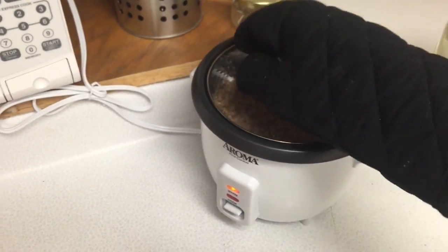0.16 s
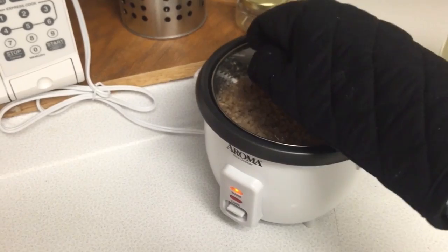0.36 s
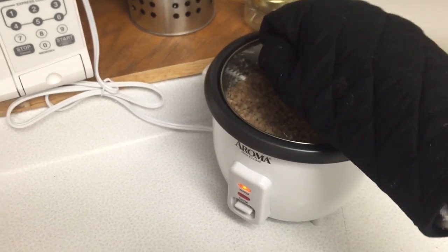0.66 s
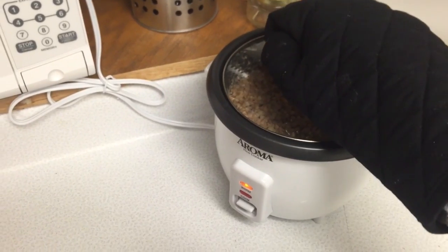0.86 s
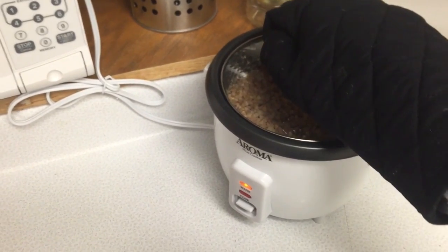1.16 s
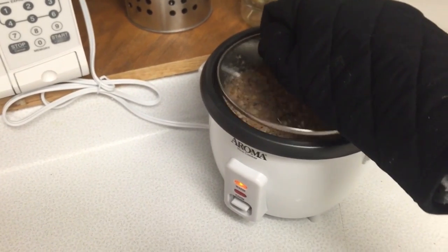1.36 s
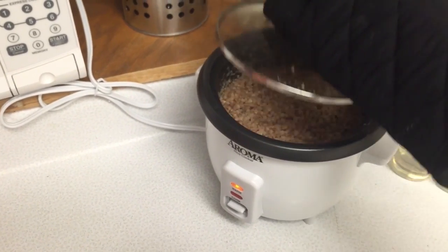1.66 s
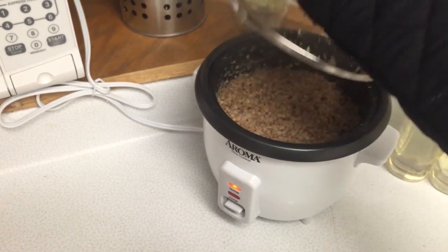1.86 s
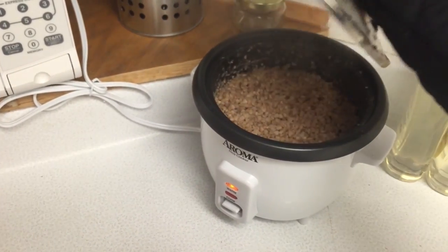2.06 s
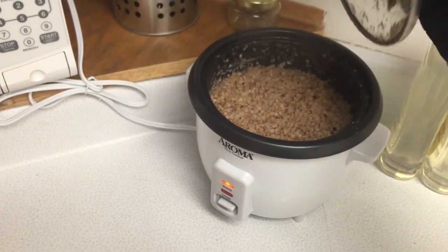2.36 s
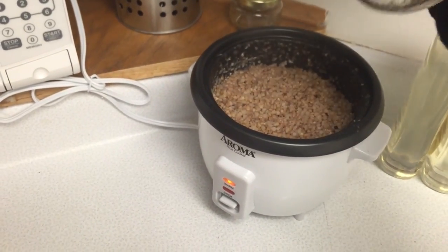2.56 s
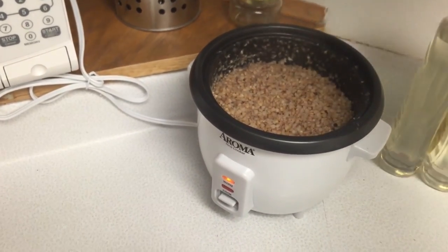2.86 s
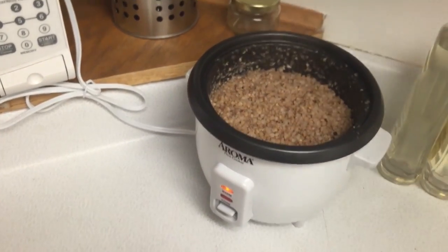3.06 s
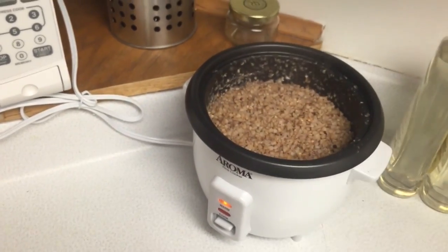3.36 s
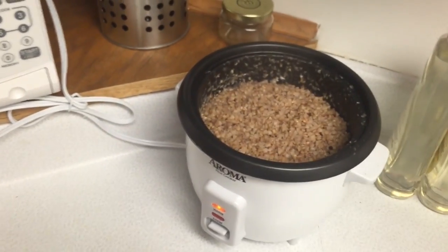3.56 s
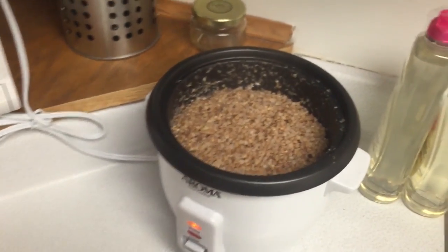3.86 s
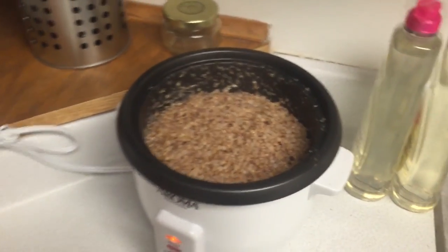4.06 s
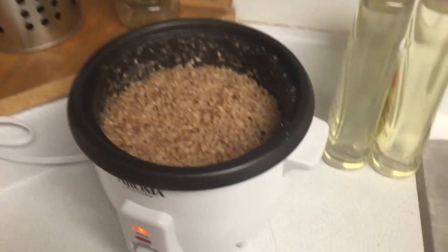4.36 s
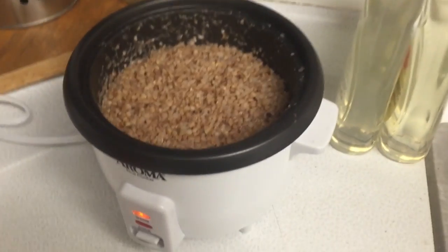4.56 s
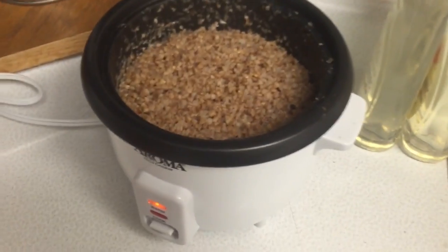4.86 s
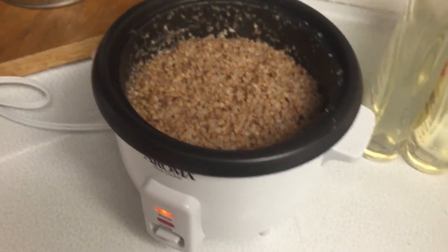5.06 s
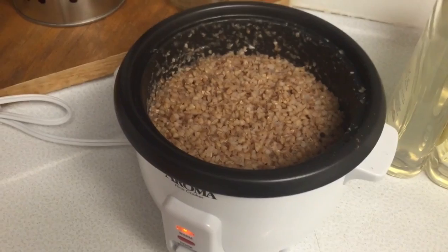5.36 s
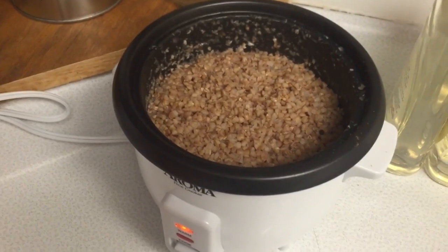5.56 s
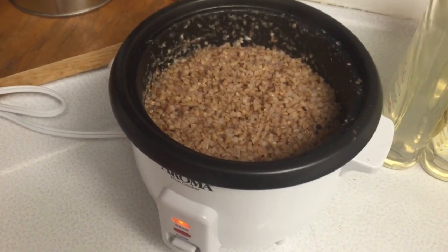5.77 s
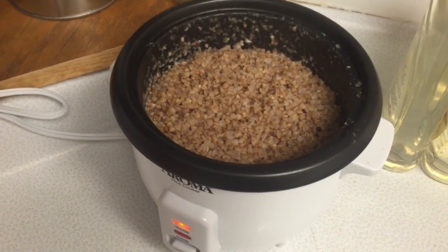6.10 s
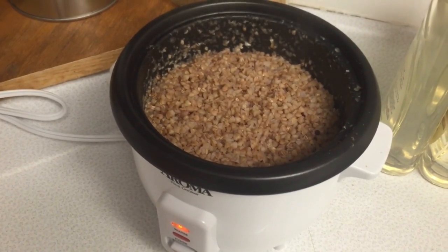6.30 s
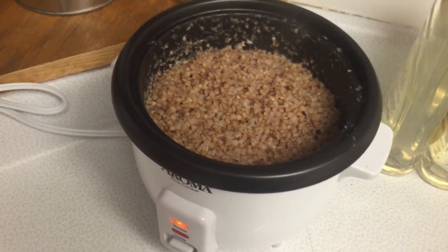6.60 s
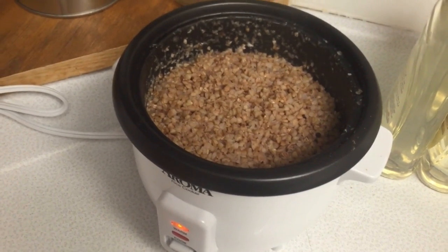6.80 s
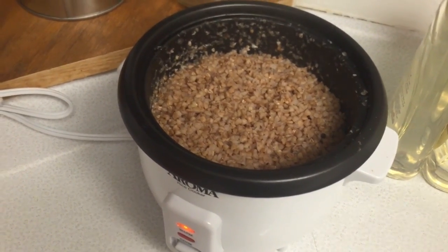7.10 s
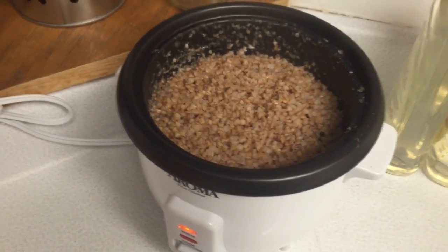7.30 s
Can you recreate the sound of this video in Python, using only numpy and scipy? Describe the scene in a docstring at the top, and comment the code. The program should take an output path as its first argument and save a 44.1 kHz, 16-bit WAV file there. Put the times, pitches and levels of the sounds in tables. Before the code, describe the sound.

An oven mitt rubs and rattles a rice cooker's glass lid, which clinks twice over a faint kitchen hum.

```python
"""Over the slowly beating hum of a refrigerator and the mains, a quilted oven mitt rubs on a knob.
The knob is on a rice cooker's glass lid, which jostles in its seat and excites the modes of the pot.
The lid lifts off, simmer and hiss grow, and the steel-rimmed glass clinks in free, damped vibration,
once on the way and again as it is set down. Tiny ticks and two faint taps are heard as well,
and the small kitchen reverberates to the handling."""
import sys
import numpy as np
from scipy import signal
from scipy.fft import rfft, irfft, next_fast_len
from scipy.io import wavfile
from scipy.ndimage import map_coordinates

SR = 44100
rng = np.random.default_rng(int(sys.argv[2]) if len(sys.argv) > 2 else 0)


def unload_audio(sound):
    """Save the sound as a 16-bit wav file, at the path given as the first command line argument."""
    columns = np.transpose(np.atleast_2d(sound))
    # keep every value between -1 and 1, then stretch to whole-number steps
    steps = np.round(np.clip(columns, -1, 1) * 32767)
    wavfile.write(sys.argv[1], SR, steps.astype(np.int16))


N = 328104

# harmonics of the compressor shaft and of the mains: (harmonic number, level/dB)
COMPRESSOR_HARMONICS = [(1, -65.5), (2, -61.5), (3, -74.5), (4, -72.5), (5, -71.5), (6, -68.5), (7, -71),
                        (8, -56.5), (9, -76.5), (10, -100), (13, -84.5), (15, -82), (19, -88), (23, -99),
                        (24, -79.5), (38, -82.5), (83, -84.5)]
MAINS_HARMONICS = [(2, -69), (6, -74), (8, -73.5), (12, -79.5)]
COMPRESSOR_GAIN = [(3.5, 0.74), (5, -1.7)]  # its harmonics drop a little: (t/s, level/dB)
# spectra of gas pulses, house rumble, simmer, hiss and rustling cloth: (f/Hz, level/dB)
BUZZ_SPECTRUM = [(500, -25), (900, -1), (2000, -0.5), (2800, -6.5), (3700, -2.5), (5000, -15),
                 (9000, -36)]
RUMBLE_SPECTRUM = [(20, -36), (35, -28), (55, 7.5), (72, -8), (95, 5), (150, -2), (230, -15), (380, -10.5),
                   (650, -17.5), (1500, -56)]
SIMMER_SPECTRUM = [(200, 5.5), (750, -2.5), (1100, 4), (1350, -2), (1700, 2), (2200, 2.5), (2900, -6.5),
                   (3800, -5.5), (5000, -16), (7000, -17)]
HISS_SPECTRUM = [(2500, -23), (4000, 0), (5000, -1.5), (6200, 2.5), (6750, 3.5), (7400, -3.5), (8000, 1.5),
                 (9000, 1), (9900, -1.5), (10400, -7.5), (11000, -3.5), (13000, -7), (15400, -10)]
CLOTH_SPECTRUM = [(200, -5), (700, -18), (1150, 3.5), (1600, -6), (2100, -5), (3000, -17.5), (6000, -17.5),
                  (15000, -33.5)]
# slips of the mitt on the knob: (middle t/s, length/s, f/Hz, glide/(Hz/s), level/dB)
MITT_SLIPS = [(0.274, 0.036, 1320, 499.5, -47), (.356, 0.094, 1335, -450, -46),
              (0.56, 0.084, 1120, -1500, -59), (0.673, .05, 1335, 301, -53)]
# reverberation time of the kitchen: (f/Hz, t60/s)
KITCHEN_DECAY = [(150, 0.41), (700, 0.37), (2500, 0.31), (6000, 0.25), (14000, 0.23)]
# modes of the pot with the lid seated: (f/Hz, t60/s, level/dB)
POT_MODES = [(181, 0.098, -11), (246, 0.065, -5.5), (319, 0.068, -3.5), (461, 0.075, -8),
             (550, 0.11, -14.5), (878, 0.091, -13.5), (977, 0.076, -7.5), (1076, 0.073, -9.5),
             (1197, 0.064, -7), (1493, 0.05, -0.5), (1613, 0.084, 1), (1736, 0.056, 3), (2242, 0.046, -1),
             (2380, 0.042, -10), (2970, 0.028, -12.5), (3740, .04, -26), (4350, 0.14, -24.5),
             (5320, .07, -27)]
# the lid jostles the pot:
# (t/s, rattle level/dB, bass gain/dB, treble gain/dB, thump level/dB,
#  scrape level/dB before doubling, scrape t60/s)
LID_KNOCKS = [(0.4912, -32.5, 6.5, -17, -31.5, -52, .05), (0.6003, -43, 4, -2, -56, -68, .06),
              (.6060, -44, -9, 0, -60, -45, 0.076), (0.6953, -42.5, 2.5, -14, -41, -68, .05),
              (0.9091, -43, -13, 1, -67, -38, 0.048), (1.4232, -29.5, 1, 1.5, -55, -44, 0.048),
              (1.4400, -45, 8, -10, -27.5, -67, .04), (1.464, -48, -9, -10, -56, -75, .04)]
# faint bright ticks: (t/s, level/dB)
TICK_EVENTS = [(1.8125, -55), (1.9554, -48), (2.0875, -50), (2.1927, -56), (5.8304, -62)]
# modes of the glass lid: (f/Hz, t60/s, level/dB struck on the rim, level/dB set down)
GLASS_MODES = [(666, .44, -36, -53), (1601, .46, -37, -33), (2862, .25, -28, -33), (4328, .04, -28, -31),
               (4447, .08, -16, -17), (5580, .055, -35, -28), (6302, .07, -10, -19), (7235, .055, -21, -39),
               (8462, .085, -27, -34), (9249, .05, -21, -48), (10852, .055, -26, -51),
               (11690, .04, -32, -46), (13430, .05, -27, -48)]
# contacts of the glass:
# (t/s, ring level/dB, clash level/dB, clash low f/Hz, clash high f/Hz, clash t60/s,
#  ring rise/s, damping by the support/(dB/s))
GLASS_CONTACTS = [(1.9768, 0, -18, 1800, 17000, 0.05, 0.0014, 18),
                  (5.3132, -2, -23, 3900, 5830, 0.038, 0.00071, 50)]
# faint taps in the kitchen: (t/s, level/dB, t60/s)
TAP_EVENTS = [(3.533, -43.5, 0.12), (3.562, -57, .08)]
# spectra of the rim's scrape, a tick, the rim's clash and a tap: (f/Hz, level/dB)
SCRAPE_SPECTRUM = [(300, -19), (900, -0.5), (1800, 1), (3300, -3.5), (5800, -10.5), (8000, -15.5),
                   (11000, -29), (15000, -30)]
TICK_SPECTRUM = [(2000, -8), (8000, 2), (15000, -7)]
CLASH_SPECTRUM = [(300, -36), (1150, -7.5), (1800, 1), (2500, -2), (4200, 1), (5600, -1.5), (6400, 1.5),
                  (7800, -2.5), (9300, -4), (12000, -5.5), (14000, -5), (15000, -26)]
TAP_SPECTRUM = [(150, -15), (320, 8), (700, -8), (1150, -3), (1700, 5), (2700, -12), (4200, -12),
                (8000, -20), (15000, -40)]

COMPRESSOR_HZ, MAINS_HZ = 58.8, 60
LIFT_MIDDLE_S, LIFT_LENGTH_S = 1.7, 0.67
GRIP_FROM_S, GRIP_UNTIL_S = 0.18, 0.61  # the hand seeks its grip
RUSTLE_RISE_DB_PER_S, RUSTLE_FALL_DB_PER_S = 45, 19
SLIP_SAG_HZ_PER_S2 = 7000  # the pitch arches as the hand speeds up and slows
CUTOFF_HZ = 15600


def amp(db):
    """Amplitude ratio of a level in decibels."""
    return 10 ** (np.asarray(db) / 20)


def unit(x):
    """Normalisation to rms 1."""
    return x / np.sqrt(np.mean(x ** 2) + 1e-20)


def along(points, hz):
    """Interpolation of (f/Hz, value) points on a logarithmic frequency axis."""
    f, values = np.transpose(points)
    return np.interp(np.log(hz + 1), np.log(f + 1), values)


def wobble(rate):
    """Smooth random modulation: a spline through `rate` knots a second."""
    return map_coordinates(rng.standard_normal(int(N * rate / SR) + 4), [np.arange(N) * rate / SR])


def filtered(x, response):
    """Linear filtering: the spectrum of x times a frequency response."""
    size = next_fast_len(len(x) + 8192)
    return irfft(rfft(x, size) * response(np.fft.rfftfreq(size, 1 / SR)), size)[:len(x)]


def noise(spectrum, size):
    """Spectral shaping of white noise, at rms 1."""
    return unit(filtered(rng.standard_normal(size), lambda hz: amp(along(spectrum, hz))))


def fade(t, t60, rise):
    """Envelope of an impact: quick build-up, exponential decay."""
    return np.exp(-np.log(1000) * t / t60) * (1 - np.exp(-t / rise))


def ring(t, hz, t60, rise):
    """Damped oscillation of one mode, with random phase."""
    return np.sin(2 * np.pi * (hz * t + rng.random())) * fade(t, t60, rise)


def add(track, onset, sound):
    """Superposition of a sound on the track from `onset` seconds."""
    part = track[round(onset * SR):][:len(sound)]
    part += sound[:len(part)]


def hum():
    """Beats: the compressor motor slips behind the mains, so their harmonics throb against each other."""
    t = np.arange(N) / SR
    beat_t = t - 4.35  # counted from a moment when shaft and mains are in step
    turns = COMPRESSOR_HZ * beat_t + 0.016 * wobble(3)
    phases = rng.random(128)

    def harmonics(lines, cycles):
        """Fourier series whose partials waver in level."""
        return sum(np.sqrt(2) * amp(db + 0.7 * wobble(2))
                   * np.sin(2 * np.pi * (k * cycles + phases[round(k)])) for k, db in lines)

    puff = noise(BUZZ_SPECTRUM, SR // 59)  # one puff of gas per turn makes a faint buzz
    buzz = np.interp(turns, np.arange(len(puff)) / len(puff), puff, period=1)
    gain_db = np.interp(t, *np.transpose(COMPRESSOR_GAIN))
    compressor = amp(gain_db) * harmonics(COMPRESSOR_HARMONICS, turns)
    return compressor + harmonics(MAINS_HARMONICS, MAINS_HZ * beat_t) + amp(-69) * buzz


def house_rumble():
    """Low-frequency noise of the house, fluctuating and slowly sinking in level."""
    t = np.arange(N) / SR
    return noise(RUMBLE_SPECTRUM, N) * amp(-56.5 - 0.45 * t + 2.0 * wobble(9.8))


def hot_rice():
    """Transmission loss: the lid attenuates the airy simmer and fine hiss until it is lifted."""
    t = np.arange(N) / SR
    covered = np.clip(0.5 - (t - LIFT_MIDDLE_S) / LIFT_LENGTH_S, 0, 1)
    simmer = noise(SIMMER_SPECTRUM, N) * amp(-62 - 3 * covered + 0.61 * wobble(23) + 0.57 * wobble(2.55))
    hiss = noise(HISS_SPECTRUM, N) * amp(-65.5 - 4 * covered)
    return simmer + hiss


def mitt():
    """Friction: the rustling weave zips over the knob at a frequency that follows the hand's speed."""
    out, t = np.zeros(N), np.arange(N) / SR
    unevenness = 1 + 0.0108 * wobble(250)
    grip = amp(0.5 * wobble(140))
    for middle, length, hz, glide, db in MITT_SLIPS:
        thread_hz = hz + glide * (t - middle) - SLIP_SAG_HZ_PER_S2 * (t - middle) ** 2
        phase = 2 * np.pi * np.cumsum(thread_hz * unevenness) / SR
        swell = 1 / (1 + np.abs(2 * (t - middle) / length) ** 4.5)
        out += np.sqrt(2) * amp(db) * swell * grip * (np.sin(phase) + amp(-27) * np.sin(2 * phase))
    # the cloth rustles while the hand seeks its grip, and quietens once it holds the knob
    reach_db = RUSTLE_RISE_DB_PER_S * np.maximum(GRIP_FROM_S - t, 0)
    hold_db = RUSTLE_FALL_DB_PER_S * np.maximum(t - GRIP_UNTIL_S, 0)
    rustle = unit(noise(CLOTH_SPECTRUM, N) * amp(3.3 * wobble(60)))
    return out + amp(-59.5 - reach_db - hold_db) * rustle


def kitchen_echo(x):
    """Reverberation: diffuse wall reflections decay exponentially, each frequency at its own rate."""
    hz, t, spectra = signal.stft(rng.standard_normal(SR // 2), SR, nperseg=256)
    decay = np.exp(-np.log(1000) * t / along(KITCHEN_DECAY, hz)[:, None])
    _, tail = signal.istft(spectra * decay, SR, nperseg=256)
    delayed = np.pad(x, (SR // 200, 0))
    return signal.fftconvolve(delayed, tail / np.linalg.norm(tail))[:N]


def lid_knocks():
    """Impact excitation: the seated lid rings the pot, its rim scrapes, the cooker rocks on its feet."""
    out, t = np.zeros(N), np.arange(SR // 3) / SR
    for onset, db, bass_db, treble_db, thump_db, scrape_db, scrape_t60 in LID_KNOCKS:
        pot = np.zeros(len(t))
        for hz, t60, mode_db in POT_MODES:
            colour_db = bass_db * (hz < 400) + treble_db * (hz > 3400) + rng.normal(0, 2.7)
            pot += amp(mode_db + colour_db) * ring(t, hz, t60, rise=0.0016)
        thump = ring(t, hz=131.7, t60=0.12, rise=0.003)
        scrape = 2 * noise(SCRAPE_SPECTRUM, len(t)) * fade(t, scrape_t60, rise=0.0028)
        add(out, onset, amp(db) * pot + amp(thump_db) * thump + amp(scrape_db) * scrape)
    return out


def ticks():
    """Brief transients have broad spectra: small ticks sound brightly."""
    out, t = np.zeros(N), np.arange(SR // 20) / SR
    for onset, db in TICK_EVENTS:
        add(out, onset, amp(db) * noise(TICK_SPECTRUM, len(t)) * fade(t, t60=0.018, rise=0.0003))
    return out


def glass_clinks():
    """Modal vibration: the point of contact decides how strongly each mode of the glass is excited."""
    out, t = np.zeros(N), np.arange(SR) / SR
    for k, contact in enumerate(GLASS_CONTACTS):
        onset, ring_db, clash_db, low_hz, high_hz, clash_t60, rise, damping = contact
        glass = sum(amp(levels[k]) * ring(t, hz, t60, rise) for hz, t60, *levels in GLASS_MODES)
        # the steel rim adds a dense, short-lived clash, narrower in band for a softer contact
        band = lambda hz: 1 / np.sqrt((1 + (hz / high_hz) ** 5) * (1 + (low_hz / (hz + 1)) ** 4))
        clash = unit(filtered(noise(CLASH_SPECTRUM, len(t)), band))
        clash *= fade(t, clash_t60, rise=0.000193)
        add(out, onset, amp(ring_db - damping * t) * glass + amp(clash_db) * clash)
    return out


def taps():
    """Soft impacts carry little treble: dull taps a little way off."""
    out, t = np.zeros(N), np.arange(SR // 3) / SR
    for onset, db, t60 in TAP_EVENTS:
        add(out, onset, amp(db) * noise(TAP_SPECTRUM, len(t)) * fade(t, t60, rise=0.0035))
    return out


def scene():
    """Direct and reverberant sound superpose; the lid clinks in two places, each with its own echo."""
    glass = glass_clinks()
    handling = lid_knocks() + taps() + ticks() + mitt()
    set_down = np.arange(N) / SR >= GLASS_CONTACTS[1][0]
    glass_echo = kitchen_echo(glass * ~set_down) + kitchen_echo(glass * set_down)
    echo = amp(-17.5) * glass_echo + amp(-19) * kitchen_echo(handling)
    return (glass + handling + echo + hum() + house_rumble() + hot_rice())[None]


def record(dry):
    """Band limiting: an ideal low-pass filter passes nothing above the cutoff."""
    return np.array([filtered(channel, lambda hz: hz < CUTOFF_HZ) for channel in dry])


dry = scene()
out = record(dry)
unload_audio(out)
```